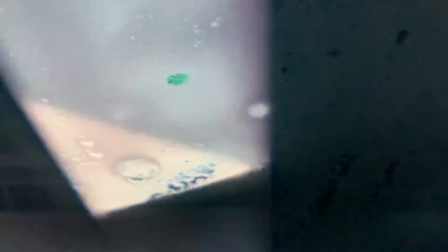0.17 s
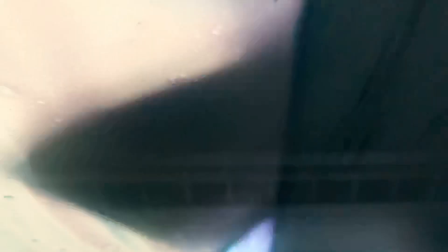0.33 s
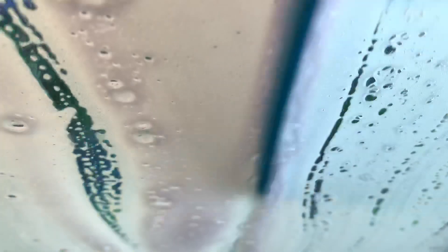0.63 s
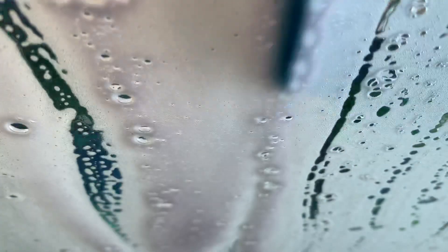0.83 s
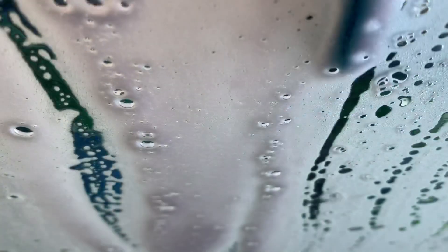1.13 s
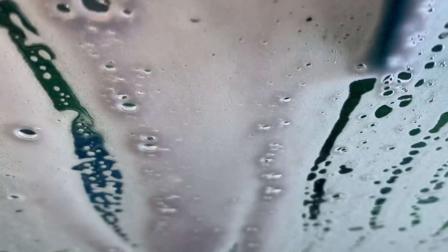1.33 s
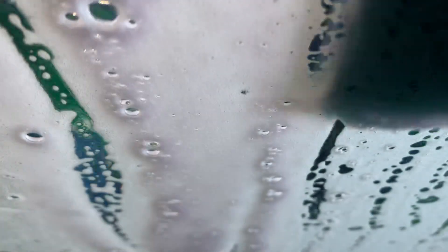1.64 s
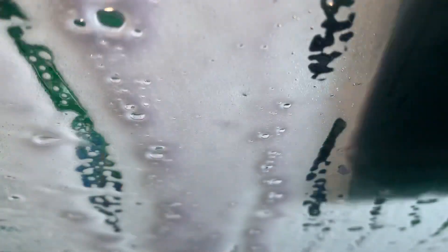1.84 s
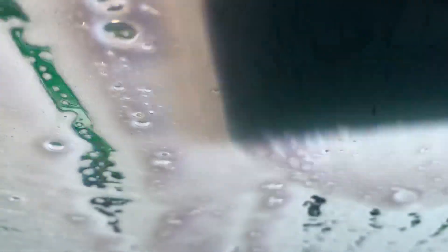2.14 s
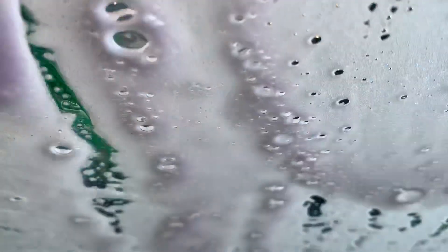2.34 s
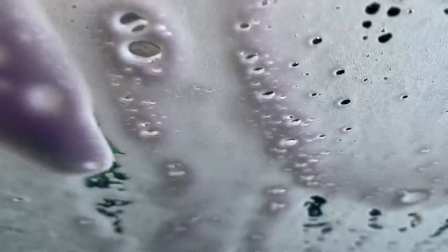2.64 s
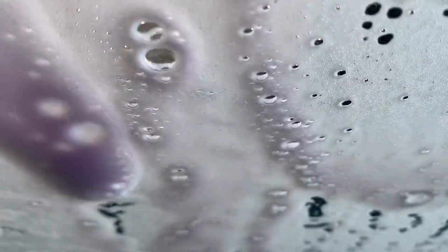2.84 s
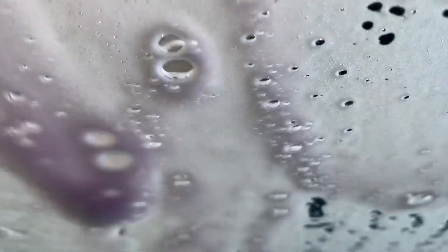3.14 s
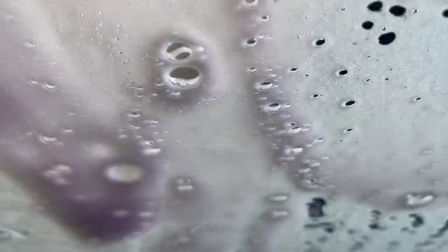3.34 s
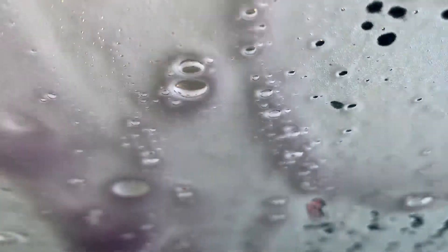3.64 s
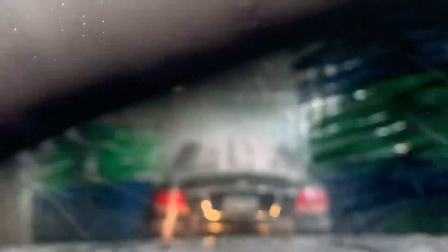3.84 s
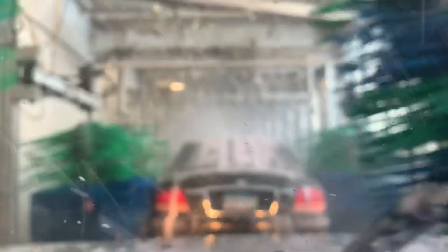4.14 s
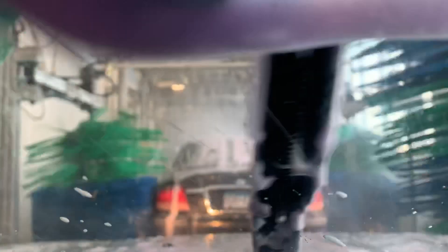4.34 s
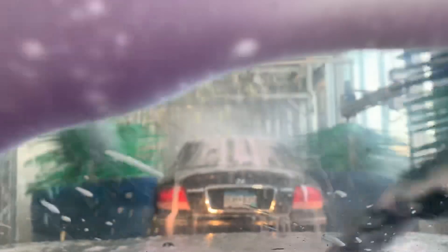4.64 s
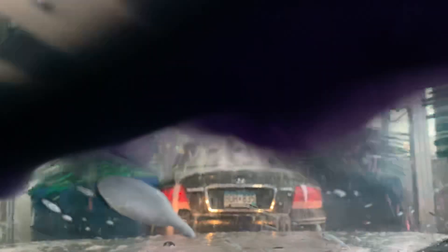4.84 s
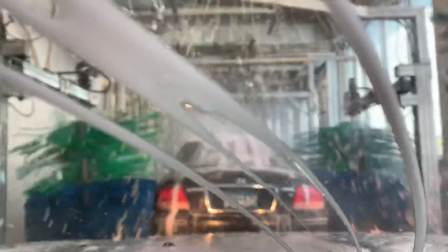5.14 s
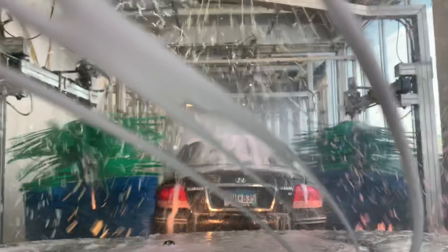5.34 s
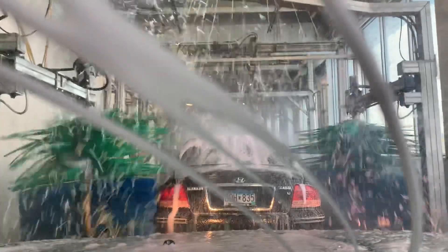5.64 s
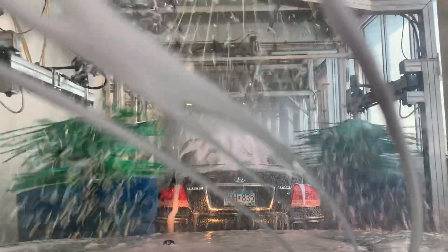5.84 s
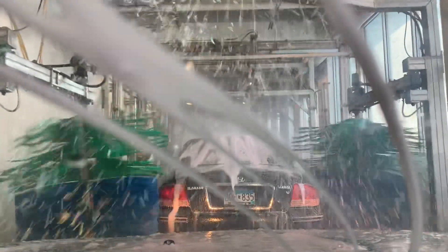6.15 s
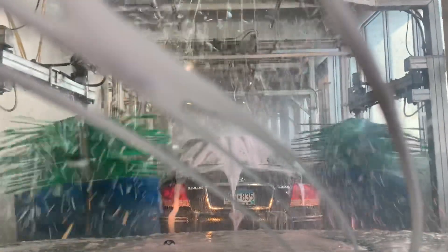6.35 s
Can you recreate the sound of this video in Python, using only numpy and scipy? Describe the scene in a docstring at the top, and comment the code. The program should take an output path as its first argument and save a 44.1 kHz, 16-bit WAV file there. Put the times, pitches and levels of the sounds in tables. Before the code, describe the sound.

Inside a car in a wash tunnel, a microphone behind the windscreen hears a spinning cloth brush beating the far panels in a fast, uneven rhythm. Wet strips patter on metal and scrub the glass over hissing spray and a deep cabin rumble. The brush moves close and lands loud, hollow whacks with splashes, then eases a little while staying near. Hard drops click on the glass, and a faint, thin squeak slips by near the end.

```python
"""Inside a car in a wash tunnel, one microphone behind the windscreen. From the start a spinning cloth
brush flogs the far panels about seven times a second: packs of wet strips patter on metal, scrub the
glass and fling water, while spray drums and the rocking body booms in the cabin. From 2 s the brush
moves in beside the microphone, whacking hardest near 3.2 s. Then it eases, still close; hard drops
click on the glass, clearest at 5.25 s, and a thin wet squeak slips by just before the end."""
import sys
import numpy as np
from scipy import signal
from scipy.fft import rfft, irfft, next_fast_len
from scipy.io import wavfile
from scipy.ndimage import uniform_filter1d, minimum_filter1d, map_coordinates

SR = 44100
rng = np.random.default_rng(int(sys.argv[2]) if len(sys.argv) > 2 else 0)


def materialize(psi):
    """Save the field psi as 16-bit PCM at rate SR to the path in sys.argv[1].

    A 1-D psi becomes a single channel; in a 2-D psi each row is a channel.
    """
    bounded = np.clip(np.atleast_2d(psi).T, -1, 1)
    quanta = np.round(bounded * 32767).astype(np.int16)
    wavfile.write(sys.argv[1], SR, quanta)


N = 285768

# packs of strips landing on the car: (time [s], time in contact [s], level [dB])
PACK_LANDINGS = [(0.008, .07, -4), (0.109, 0.11, 2.3), (0.26, 0.077, 1.5), (0.355, 0.12, 0.32),
                 (0.511, 0.16, -1.8), (0.69, 0.065, -2.5), (0.801, 0.15, 1), (1.0, .11, -0.5),
                 (1.172, 0.081, 0.7), (1.322, 0.061, 0.9), (1.484, 0.1, -4), (1.6, 0.08, -1.2),
                 (1.727, 0.057, 1.4), (1.815, 0.14, 0.2), (1.975, 0.1, -1), (2.099, .13, 0.5),
                 (2.262, 0.11, 0.5), (2.427, 0.096, -1), (2.573, 0.11, -1.1), (2.712, 0.11, -0.5),
                 (2.867, 0.11, -1.5), (3.029, 0.11, 0.5), (3.189, 0.084, 0.068), (3.284, 0.092, -1.5),
                 (3.395, 0.1, -2.5), (3.512, 0.095, -1.5), (3.644, 0.11, 0), (3.806, 0.091, 0.86),
                 (3.922, 0.18, -2.3), (4.116, 0.1, -1.5), (4.261, 0.11, -0.5), (4.427, 0.068, 2.1),
                 (4.516, 0.036, -1), (4.575, 0.14, 0), (4.742, 0.11, 0.5), (4.879, 0.13, 0.2),
                 (5.044, 0.096, -1.4), (5.194, 0.14, 1), (5.334, 0.19, -0.3), (5.526, 0.09, 0),
                 (5.651, 0.089, 0.8), (5.783, 0.14, 1.4), (5.972, 0.051, 3), (6.06, 0.038, 1.8),
                 (6.141, 0.084, -2.5), (6.25, 0.081, 0.5), (6.38, .1, -1)]
# how hard the packs work each surface: (time [s], metal [dB], glass [dB], splash [dB])
SURFACE_LEVELS = [(0, -41, -34.5, -47.5), (0.65, -36, -38, -41.5), (1.25, -36, -35.5, -38.5),
                  (1.7, -23, -31, -33), (2.0, -28.5, -24, -28), (2.55, -16, -20, -27.5),
                  (3.1, -16, -22.5, -29.5), (3.55, -15.5, -30.5, -33), (4.1, -19.5, -26, -34.5),
                  (4.8, -18.5, -31, -38), (5.4, -23, -35.5, -39.5), (5.9, -20, -33.5, -38),
                  (6.48, -18, -35, -38)]
# the brush's way from the far panels to the microphone: (time [s], nearness [0-1])
BRUSH_NEARNESS = [(0, 0), (2.0, 0.05), (2.5, 0.81), (6.48, 0.92)]
# the wash between the packs: (time [s], trailing strips [dB], spray [dB])
WASH_LEVELS = [(0, -19.5, -33), (0.92, -19, -35), (1.5, -16.5, -29), (2.33, -13, -30), (3.45, -9.5, -23.5),
               (4.4, -15.5, -32.5), (5.0, -16, -30), (6.48, -18.5, -30.5)]
# the brush swings clear of the car: (time [s], dip [dB])
BRUSH_LULLS = [(1.155, -2), (1.465, -2.5), (2.411, -5), (2.557, -1), (3.012, -4.5), (3.17, -2.5),
               (3.626, -8), (3.785, -4.5), (4.245, -1.5), (4.402, -7), (4.866, -2), (5.025, -4.5),
               (5.515, -6), (5.636, -4.5), (6.131, 0), (6.357, -6)]
# the hardest strip blows: (time [s], ring [dB], panel pitch [Hz], wet burst [dB])
PANEL_WHACKS = [(1.194, -9, 306, -10), (1.383, -15, 290, -8.5), (1.746, -7, 237, -8), (1.846, -6, 290, -8),
                (1.996, -10, 255, -11.5), (2.134, -13, 291, -4), (2.296, -3.5, 318, -12),
                (2.431, -1, 377, 0), (2.474, 0.5, 386, -12), (2.594, -4, 298, 2), (2.625, -2, 391, -5.5),
                (2.735, 1, 334, 1.5), (2.795, -4, 475, -6.5), (2.895, -1, 403, -2), (2.929, 4, 325, 1),
                (2.963, 5, 380, 1), (3.028, -2.5, 300, -0.5), (3.115, 0.5, 299, -11),
                (3.191, 11.5, 375, 5.5), (3.237, 1.5, 326, -2.5), (3.342, 8, 352, 0),
                (3.479, 0.5, 402, -11), (3.511, 5, 328, -1.5), (3.52, 4, 209, -10.5),
                (3.583, -2, 600, -1.5), (3.646, -8, 390, -7.5), (3.733, 0.5, 337, -8.5),
                (3.806, 1.5, 330, -7.5), (3.841, -4, 352, -10.5), (3.874, -11, 286, -15),
                (3.97, -7, 350, -6.5), (4.121, 3.5, 330, -7), (4.157, -7, 361, -10.5), (4.208, -5, 330, -5),
                (4.263, -2, 287, -8), (4.467, 2, 309, -6.5), (4.587, -9, 347, -12), (4.664, -4, 357, -20.5),
                (4.762, -3.5, 347, -10), (4.78, -6, 248, -15), (4.885, -4.5, 582, -9.5),
                (4.917, -4, 366, -11), (5.09, -0.5, 315, -4), (5.2, -4.5, 316, -11.5),
                (5.259, -0.5, 353, -8.5), (5.379, -1.5, 359, -3.5), (5.461, -4, 360, -12.5),
                (5.545, -5, 350, -17), (5.603, -4, 370, -11), (5.651, -4, 365, -15), (5.705, -3, 412, -8.5),
                (5.99, 2, 347, -11.5), (6.013, -1, 312, -17), (6.062, -2.5, 353, -7.5),
                (6.145, -6, 253, -6.5), (6.193, -5.5, 360, -11.5), (6.252, -2.5, 272, -12.5),
                (6.306, 2, 329, -5), (6.379, -7, 354, -10.5), (6.466, 1, 334, -11)]
# gobs of water hitting the glass: (time [s], level [dB])
WATER_GOBS = [(0.013, -18.5), (0.058, -24.5), (0.116, -21.5), (0.187, -17.5), (0.268, -21.5), (0.37, -26),
              (0.478, -23.5), (0.51, -26.5), (0.625, -24), (0.745, -24.5), (0.806, -20.5), (1.0, -25),
              (1.259, -20), (1.372, -20.5), (1.534, -16), (1.61, -16), (1.668, -16), (1.731, -13),
              (1.754, -17.5), (1.81, -20), (1.838, -16), (1.897, -17.5), (2.044, -14.5), (2.128, -16),
              (2.184, -10), (2.33, -11), (2.433, -10), (2.512, -10.5), (2.577, -9.5), (2.628, -17),
              (2.735, -17), (2.8, -11.5), (2.887, -11), (2.96, -9), (3.031, -9.5), (3.226, -8.5),
              (3.296, -15), (3.322, -13.5), (3.395, -10.5), (3.513, -6.5), (4.259, -16.5), (4.577, -14.5),
              (4.873, -14.5), (4.82, -14), (5.05, -15), (5.236, -14.5), (5.69, -17.5), (5.797, -15),
              (5.96, -21), (5.847, -17.5), (5.884, -16.5), (5.924, -12), (6.193, -14)]
# hard drops on the windscreen: (time [s], level [dB])
HARD_DROPS = [(3.235, -32.5), (5.25, -21), (5.2537, -25.5)]
# the shaken body: (time [s], heave [dB], cabin boom [dB])
SHAKE_LEVELS = [(0, -19, -24), (0.27, -22.5, -23.5), (0.4, -24, -23.5), (1.4, -24.5, -23.5),
                (2.5, -26.5, -21), (3.2, -25.5, -17), (3.7, -20.5, -15), (5.2, -21.5, -17),
                (6.48, -29.5, -16.5)]
# nozzle mist: (time [s], level [dB])
MIST_LEVELS = [(0, -58), (1.1, -53), (2.27, -52), (2.5, -51), (3.36, -50), (6.48, -54.5)]

# colours of struck metal and scrubbed glass: (frequency [Hz], level [dB])
NEAR_METAL_COLOUR = [(90, -47.5), (150, -8.5), (180, -2), (235, -6), (350, -5), (450, -2), (530, -6),
                     (680, -14), (850, -21.5), (1600, -56.5), (5000, -120)]
FAR_METAL_COLOUR = [(70, -42), (115, -16), (148, -14), (175, -1), (220, 1), (265, -4), (330, -3.5),
                    (500, -11), (680, -22.5), (850, -43.5), (1600, -55), (5000, -120)]
GLASS_COLOUR = [(100, -95.5), (350, -27), (620, 2.5), (760, 4), (900, -2.5), (1200, -5.5), (1600, -5.5),
                (2000, -10), (2500, -32.5), (4500, -64), (9000, -120)]
# colours of water landing on the car: (frequency [Hz], level [dB])
NEAR_SPLASH_COLOUR = [(300, -100), (1200, -26.5), (2000, -2), (2400, -7), (2700, -3.5), (3000, -5.5),
                      (3500, -10.5), (4700, -12), (5600, -22.5), (7000, -27.5), (8400, -35.5),
                      (11000, -48.5), (13300, -46.5), (15500, -50)]
FAR_SPLASH_COLOUR = [(300, -100), (1300, -30.5), (2100, 2.5), (2600, 3), (3000, -4.5), (3400, -13),
                     (4700, -21), (5800, -28), (8200, -40), (11000, -55.5), (15500, -46.5)]
SPRAY_COLOUR = [(100, -64.5), (400, -17.5), (720, 4), (1050, 4), (1800, -6), (2600, -5), (3000, -9),
                (3600, -13.5), (4700, -22.5), (5800, -31), (8000, -39.5), (11000, -60.5), (15500, -57)]
SPATTER_COLOUR = [(800, -40), (2500, -3), (4200, -3), (5600, -5), (8000, -16.5), (10500, -36), (15500, -36)]
CLICK_COLOUR = [(1000, -24), (3800, 11), (5500, -0.5), (7500, -0.5), (10500, -21), (15000, -16)]
MIST_COLOUR = [(1500, -34), (3000, -1), (5000, -4.5), (6200, -7.5), (8200, -12.5), (9500, -21),
               (11000, -29.5), (13500, -23.5), (15500, -24.5)]
# colours of body heave and cabin boom, brush near or far: (frequency [Hz], level [dB])
NEAR_HEAVE_COLOUR = [(10, -37.5), (22, -18.5), (32, -6.5), (39, -3), (50, 10), (60, 0), (72, -13.5),
                     (200, -120)]
FAR_HEAVE_COLOUR = [(10, -38), (22, -16), (33, -3), (40, 0), (52, 3), (60, 0.5), (72, -15.5), (200, -120)]
NEAR_BOOM_COLOUR = [(20, -72.5), (52, -27.5), (62, -3.5), (71, 1), (79, -1), (87, 0.5), (102, -8.5),
                    (118, -4.5), (135, -7.5), (158, -12), (178, -7.5), (215, -14.5), (280, -59),
                    (1000, -120)]
FAR_BOOM_COLOUR = [(20, -72), (48, -20), (59, 0), (73, 2), (84, -5.5), (98, -6), (115, 0.5), (128, -3),
                   (144, -10.5), (168, -8), (215, -15.5), (280, -60.5), (1000, -120)]
# resonances of metal panels and glass panes: (frequency [Hz], width [Hz], rise [dB])
NEAR_PANEL_MODES = [(174.3, 35, 4), (244, 42, 9), (301, 16, 8.5), (345.4, 28, 12.5), (403, 19, 0.5),
                    (621, 68, 10)]
FAR_PANEL_MODES = [(108, 9.9, 2.6), (205, 26, 3), (298.5, 32, 6.1), (429.4, 20, 5.9), (615, 120, 6.4)]
NEAR_GLASS_MODES = [(972, 52, 7), (1055, 30, 3), (1140, 30, 3), (1278, 42, 7), (1396, 40, 7), (1622, 50, 4),
                    (1753, 30, 2), (1912, 36, 2), (2192, 65, 4.5), (2350, 60, 5.5), (2440, 40, 3),
                    (2560, 140, 2), (2808, 30, 5), (3212, 40, 3), (3830, 120, 3), (4382, 60, 3)]
FAR_GLASS_MODES = [(1430, 25, 6), (1642, 40, 8), (1912, 40, 5), (2210, 36, 8), (2358, 48, 6.5),
                   (2440, 32, 7), (2600, 75, 5.5), (2815, 26, 4), (2950, 45, 4), (3285, 32, 7)]
# the cabin's echo: (frequency [Hz], time to fall 60 dB [s])
CABIN_DECAY = [(100, 0.034), (1000, 0.051), (8000, 0.016)]

LAND_S, LEAVE_S, SAG_DB = 0.013, 0.015, 2  # a pack lands, slides off, slackens in between
TIPS_S, TIPS_WIDTH_S, TIPS_DB = 0.066, 0.0046, -2  # a brief dip as the tips whip in after the rest
TRAIL_S, TRAIL_SHARE = 0.03, 0.45  # loose strips drag on after each pack; the rest flap all the time
DENT_T60_S, DENT_BEND, DENT_RELAX_S = 0.1, 0.25, 0.032  # ring time, pitch fall (share), time to relax
LULL_S = 0.008
SQUEAK_S, SQUEAK_LENGTH_S, SQUEAK_HZ, SQUEAK_DB = 6.22, 0.034, 13280, -53
TOP_HZ = 15750


def brush():
    """Strips land in clumps; the same taps drum on the metal and rasp on the glass."""
    metal, glass, splash = amp(curves(SURFACE_LEVELS)) * contact(LEAVE_S)
    trailing_db, _ = curves(WASH_LEVELS)
    trailing = 1 - TRAIL_SHARE + TRAIL_SHARE * contact(TRAIL_S)
    clumps = amp(1.7 * wobble(70))
    taps = patter(rate=1100, spread_db=2)
    rasp = 0.56 * taps + patter(rate=6000, spread_db=1)
    panels = blend(ring(taps, FAR_METAL_COLOUR, FAR_PANEL_MODES),
                   ring(taps, NEAR_METAL_COLOUR, NEAR_PANEL_MODES))
    scrub = blend(ring(rasp, GLASS_COLOUR, FAR_GLASS_MODES), ring(rasp, GLASS_COLOUR, NEAR_GLASS_MODES))
    water = blend(ring(rasp, FAR_SPLASH_COLOUR, FAR_GLASS_MODES),
                  ring(rasp, NEAR_SPLASH_COLOUR, NEAR_GLASS_MODES))
    force = np.hypot(amp(-1) * metal, amp(trailing_db - 6) * trailing)
    drum = force * steady(panels, evenness=0.3, size=SR // 25)
    wetness = amp(0.64 * wobble(38))  # some strips carry more water than others
    bright = amp(-1) * glass * scrub + amp(-2.5) * splash * wetness * water
    return clumps * drum + cabin(clumps * bright, wet_db=-10)


def contact(leave_s):
    """Force of the packs on the car: each lands fast, slackens and slides off."""
    t, power = np.arange(N) / SR, np.zeros(N)
    for start, hold, db in PACK_LANDINGS:
        span = slice(*np.searchsorted(t, [start - LAND_S, start + hold + .5]))
        age = t[span] - start
        landing = np.clip(age / LAND_S + .5, 0, 1)
        sliding = np.exp(-np.maximum(age - hold, 0) / leave_s)
        slack_db = -SAG_DB * (np.clip(age / hold, 0, 1) - .5)
        tips_db = TIPS_DB * np.exp(-((age - TIPS_S) / TIPS_WIDTH_S) ** 2)
        power[span] += (amp(db + slack_db + tips_db) * landing * sliding) ** 2
    return np.sqrt(power)


def lulls():
    """Gain that dips wherever the brush swings clear of the car."""
    t = np.arange(N) / SR
    return amp(sum(db * np.exp(-((t - s) / LULL_S) ** 2) for s, db in BRUSH_LULLS))


def whacks():
    """A heavy wet strip bursts on a panel and dents it; the hollow ring sinks as the dent relaxes."""
    dents, t = np.zeros(N + SR), np.arange(SR // 6) / SR
    envelope = amp(-60 * t / DENT_T60_S) * (1 - np.exp(-t / 0.0018))
    for s, db, hz, _ in PANEL_WHACKS:
        pitch = hz * (1 + DENT_BEND * (np.exp(-t / DENT_RELAX_S) - .5))
        dent = envelope * np.sin(2 * np.pi * np.cumsum(pitch) / SR)
        dents[round(s * SR):][:len(t)] += amp(db - 7.5) * dent
    slap = bursts([(s, burst_db) for s, _, _, burst_db in PANEL_WHACKS], fade_s=0.0088)
    metal = amp(6.5) * ring(slap, NEAR_METAL_COLOUR, NEAR_PANEL_MODES)
    glass = amp(-5) * ring(slap, GLASS_COLOUR, NEAR_GLASS_MODES)
    splash = amp(-12) * ring(slap, NEAR_SPLASH_COLOUR, NEAR_GLASS_MODES)
    return dents[:N] + metal + glass + splash


def rumble():
    """The body heaves on its springs and the cabin air booms around the microphone."""
    def shaken(far, near):
        return blend(ring(rng.standard_normal(N), far), ring(rng.standard_normal(N), near))
    heave_db, boom_db = curves(SHAKE_LEVELS)
    heave = steady(shaken(FAR_HEAVE_COLOUR, NEAR_HEAVE_COLOUR), evenness=1, size=SR // 7)
    boom = steady(shaken(FAR_BOOM_COLOUR, NEAR_BOOM_COLOUR), evenness=0.51, size=SR // 12)
    return amp(heave_db + wobble(9)) * heave + amp(boom_db + 1.5 * wobble(12)) * boom  # chance lurches


def splats():
    """Flung water makes the glass ring briefly: thin on the far panes, fuller on the near ones."""
    nearness, = curves(BRUSH_NEARNESS)
    gobs = bursts(WATER_GOBS, fade_s=0.014)
    far = amp(1) * ring(gobs, FAR_SPLASH_COLOUR, FAR_GLASS_MODES)
    far += amp(-0.5) * ring(gobs, SPRAY_COLOUR, FAR_GLASS_MODES)
    near = amp(-4.5) * ring(gobs, NEAR_SPLASH_COLOUR, NEAR_GLASS_MODES)
    near += amp(-4) * ring(gobs, SPRAY_COLOUR, NEAR_GLASS_MODES)
    return np.sqrt(1 - nearness) * far + np.sqrt(nearness) * near


def spray():
    """Fine jets rain on the glass, moving toward the microphone with the brush."""
    _, spray_db = curves(WASH_LEVELS)
    drops = patter(rate=5000, spread_db=5) * amp(0.94 * wobble(25))
    panes = blend(ring(drops, SPRAY_COLOUR, FAR_GLASS_MODES),
                  ring(drops, SPRAY_COLOUR, NEAR_GLASS_MODES))
    return amp(spray_db - 3.5) * unit(cabin(panes, wet_db=-3))


def hard_drops():
    """Fat drops snap on the windscreen, close up, and their droplets scatter briefly."""
    snaps = np.zeros(N)
    for s, db in HARD_DROPS:
        snaps[round(s * SR)] = amp(db + 9)
    scatter = amp(-7.5) * bursts(HARD_DROPS, fade_s=0.006)
    return ring(snaps + scatter, CLICK_COLOUR)


def spatter():
    """Each pack sheds water in uneven handfuls that crackle on the near glass."""
    nearness, = curves(BRUSH_NEARNESS)
    handfuls = amp(4.5 * np.clip(wobble(55), -2, 1.5))
    drops = unit(ring(handfuls * patter(rate=600, spread_db=4), SPATTER_COLOUR))
    return amp(-52) * nearness * contact(LEAVE_S) * drops


def squeak():
    """Something wet slips on the glass with one thin, rough squeak."""
    progress = np.clip((np.arange(N) / SR - SQUEAK_S) / SQUEAK_LENGTH_S, 0, 1)
    hz = SQUEAK_HZ * (1 + .025 * wobble(900))
    return amp(SQUEAK_DB) * np.sin(np.pi * progress) * np.sin(2 * np.pi * np.cumsum(hz) / SR)


def mist():
    """Droplets too fine to count sizzle in the background; a few larger ones tick."""
    mist_db, = curves(MIST_LEVELS)
    droplets = patter(rate=9000, spread_db=-1) + 0.58 * patter(rate=110, spread_db=3.5)
    return amp(mist_db + 0.65 * wobble(8.3)) * unit(ring(droplets, MIST_COLOUR))


def cabin(x, wet_db):
    """Add the short answer of windows and trim, keeping the level; sliding water keeps changing it."""
    def echo():
        hz, t, noise = signal.stft(rng.standard_normal(SR // 8), SR, nperseg=256)
        decay = amp(-60 * t / along(CABIN_DECAY, hz)[:, None])
        tail = signal.istft(noise * decay, SR, nperseg=256)[1]
        return signal.oaconvolve(x, tail / np.linalg.norm(tail))[:N]
    drift = np.array([wobble(2.958) for _ in range(4)])
    wet = sum(share * echo() for share in drift / np.linalg.norm(drift, axis=0))
    return (x + amp(wet_db) * wet) / np.hypot(1, amp(wet_db))


def ring(x, colour, modes=()):
    """x through a causal body: a broad colour with resonances standing on it."""
    m = 2 * next_fast_len(N)
    hz = np.fft.rfftfreq(m, 1 / SR)
    modes_db = sum(rise / (1 + (2 * (hz - centre) / width) ** 2) for centre, width, rise in modes)
    cepstrum = irfft(np.log(amp(along(colour, hz) + modes_db)))
    cepstrum[1:m // 2] *= 2  # minimum phase: the ring follows the blow
    cepstrum[m // 2 + 1:] = 0
    return irfft(rfft(x, m) * np.exp(rfft(cepstrum)), m)[:N]


def bursts(rows, fade_s):
    """A quickly rising, dying crackle of droplets for each (time [s], level [dB]) row."""
    level, t = np.zeros(N + SR), np.arange(SR // 8) / SR
    envelope = np.exp(-t / fade_s) * (1 - np.exp(-t / (0.25 * fade_s)))
    for s, db in rows:
        level[round(s * SR):][:len(t)] += amp(db) * envelope
    return amp(1.5) * level[:N] * patter(rate=4500, spread_db=1)


def patter(rate, spread_db):
    """Random tiny impacts of uneven size, rate a second, at rms 1."""
    struck = rng.random(N) < rate / SR
    sizes = amp(spread_db * np.clip(rng.standard_normal(N), -2, 2))
    return unit(struck * sizes * rng.choice([-1, 1], N))


def blend(far, near):
    """Cross-fade from far to near at an even level as the brush approaches the microphone."""
    nearness, = curves(BRUSH_NEARNESS)
    far, near = unit(far), unit(near)
    a, b = np.sqrt(1 - nearness), np.sqrt(nearness)
    return (a * far + b * near) / np.sqrt(1 + 2 * a * b * np.mean(far * near))


def steady(x, evenness, size):
    """Iron out chance swells longer than size samples."""
    power = np.abs(uniform_filter1d(unit(x) ** 2, size=size))
    return unit(x / (power + 1e-6) ** (evenness / 2))


def wobble(rate):
    """A smooth random curve, rate knots a second."""
    return map_coordinates(rng.standard_normal(int(N * rate / SR) + 4), [np.arange(N) * rate / SR])


def curves(rows):
    """One value per sample for each column after the time."""
    s, *columns = np.transpose(rows)
    return [np.interp(np.arange(N) / SR, s, column) for column in columns]


def along(points, hz):
    """(frequency [Hz], value) points read on a log axis."""
    knots_hz, values = np.transpose(points)
    return np.interp(np.log(hz + 1), np.log(knots_hz + 1), values)


def amp(db):
    """Decibels to gain."""
    return 10 ** (np.asarray(db) / 20)


def unit(x):
    """Scale to rms 1."""
    return x / np.sqrt(np.mean(x ** 2) + 1e-20)


def scene():
    """Everything reaches one microphone behind the windscreen."""
    wash = lulls() * (brush() + spray() + spatter())
    water = mist() + splats() + hard_drops()
    return (wash + whacks() + rumble() + water + squeak())[None]


def record(dry):
    """A limiter ducks the tallest peaks; nothing is kept above the band limit."""
    needed = np.minimum(1, .98 / (np.abs(dry) + 1e-9))
    gain = uniform_filter1d(minimum_filter1d(needed, size=301), size=301)
    end_fades = np.minimum(1, np.minimum(np.arange(N), np.arange(N)[::-1]) / 64)
    m = next_fast_len(N + SR // 2)
    in_band = np.fft.rfftfreq(m, 1 / SR) < TOP_HZ
    return irfft(rfft(dry * gain * end_fades, m) * in_band, m)[:, :N]


dry = scene()
out = record(dry)
materialize(out)
```